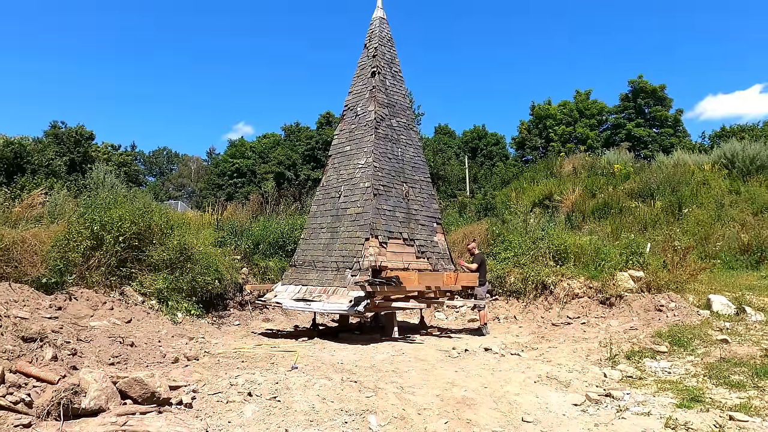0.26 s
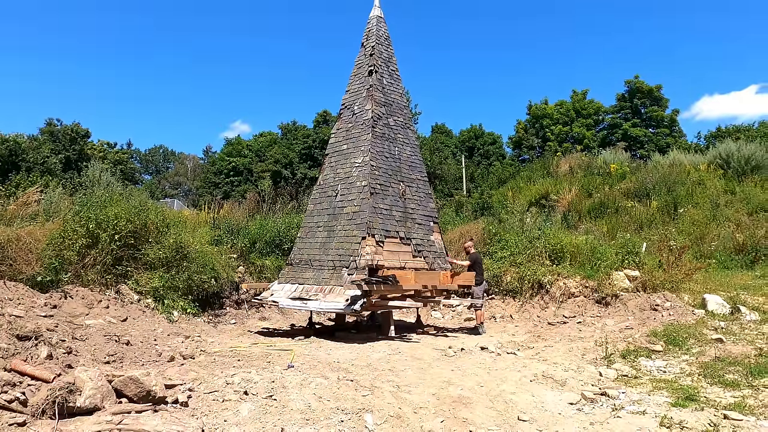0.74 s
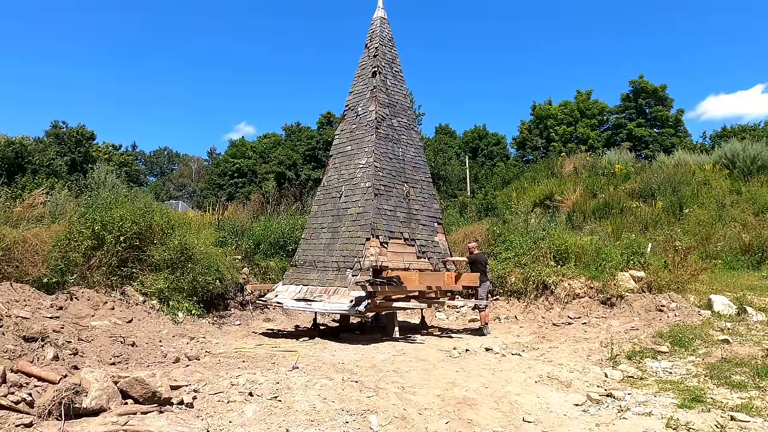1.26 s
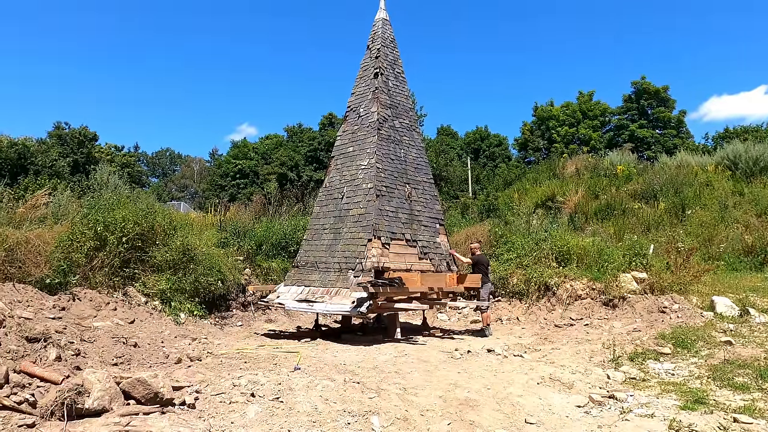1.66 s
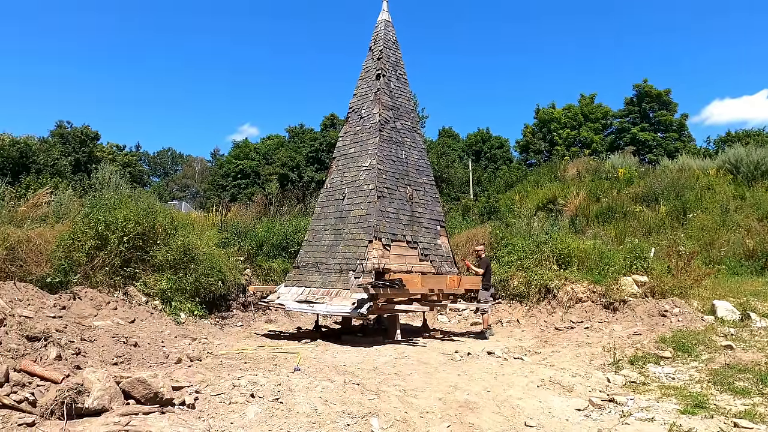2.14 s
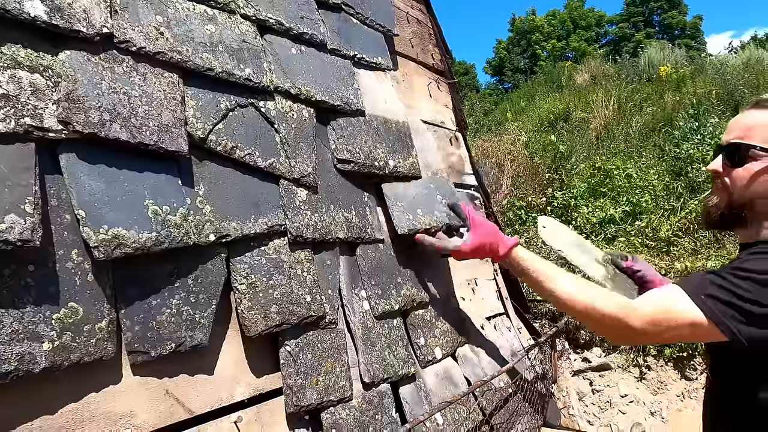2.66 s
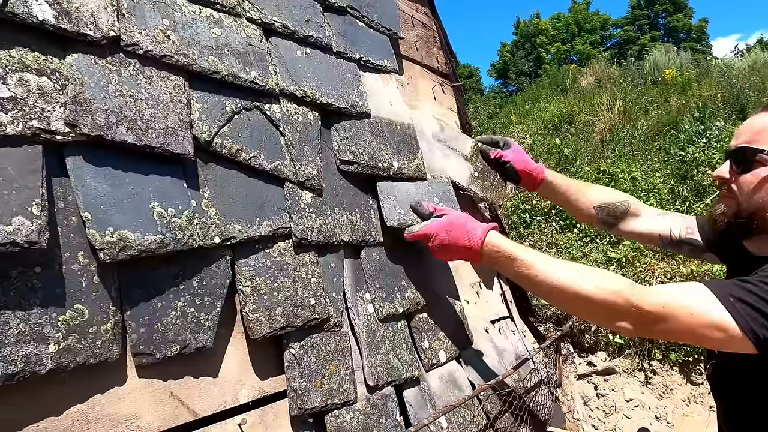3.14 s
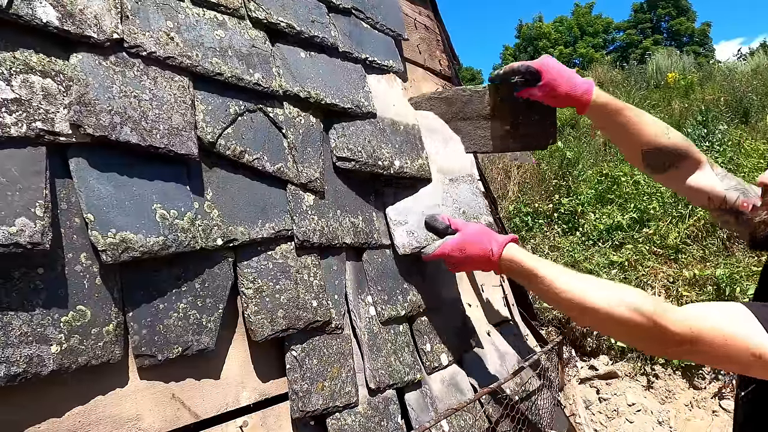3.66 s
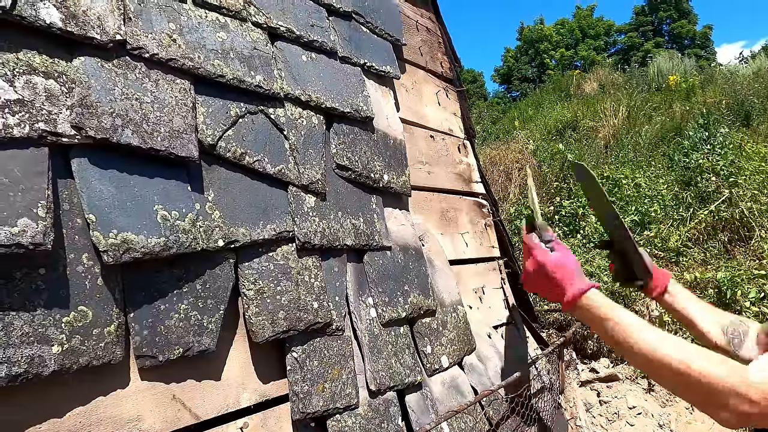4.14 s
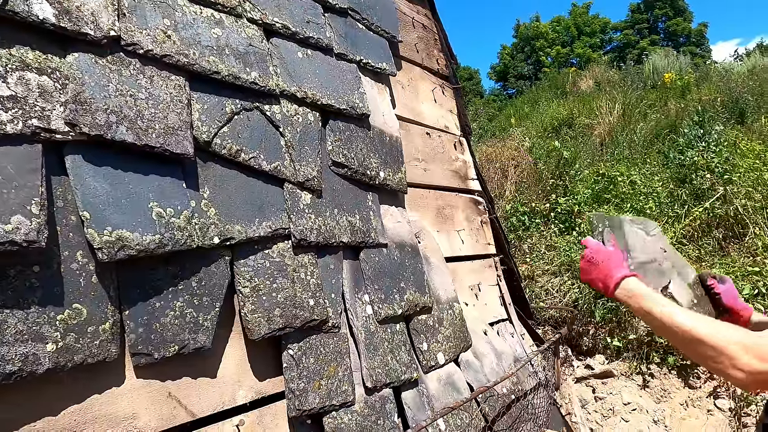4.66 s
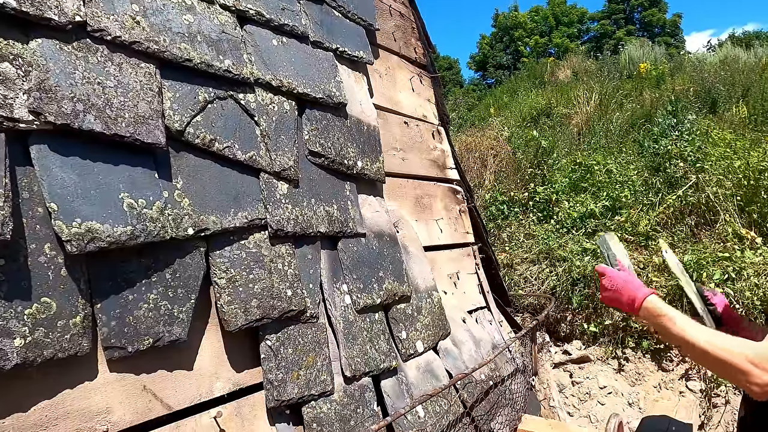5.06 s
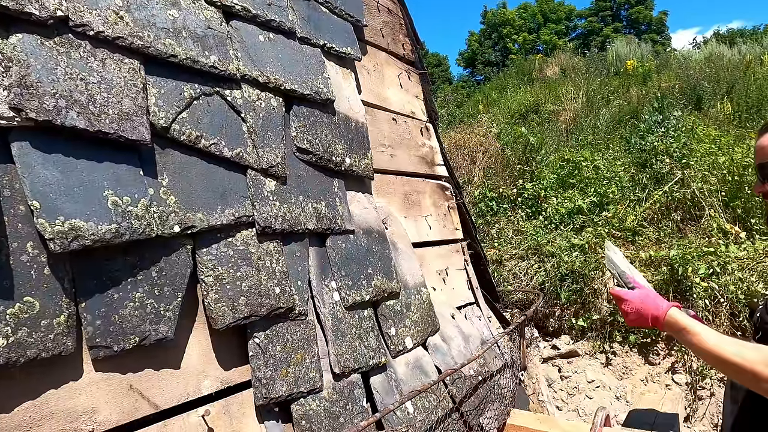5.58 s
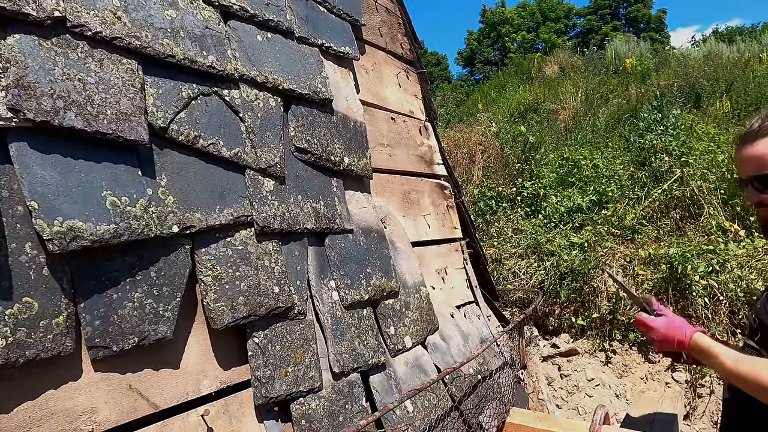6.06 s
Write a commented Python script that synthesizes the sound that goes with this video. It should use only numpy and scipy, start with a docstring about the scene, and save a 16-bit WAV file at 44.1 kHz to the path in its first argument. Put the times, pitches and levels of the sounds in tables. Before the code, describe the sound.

Outdoors, old roof slates clink faintly in the distance, then close up they scrape gritty off wooden boards, clatter and ring in the hands.

```python
"""Old slates are worked loose from a boarded spire outdoors: first heard from afar in mono, then, after a cut, close by
in stereo. Grit scrapes and edges knock, driving resonant modes: the slates ring dully on the boards and clearly once
held free in gloved hands. Shaped noise makes wind rumble on the microphone over a faint rustle of bushes.
A short scatter follows the slates; the microphone dulls the treble."""
import sys
import numpy as np
from scipy import signal
from scipy.fft import rfft, irfft, next_fast_len
from scipy.io import wavfile

SR = 44100
rng = np.random.default_rng(int(sys.argv[2]) if len(sys.argv) > 2 else 0)


def inscribe(sig):
    """Save sig as 16-bit PCM at rate SR to the path in sys.argv[1].

    A 1-D sig is mono; a 2-D sig holds one channel per row.
    Samples are clipped to [-1, 1] before scaling.
    """
    pcm = np.round(np.clip(np.atleast_2d(sig).T, -1, 1) * 32767)
    wavfile.write(sys.argv[1], SR, pcm.astype(np.int16))


N = 278712
CUT_S = 2.418  # the far view ends and the close view begins
IS_FAR = np.arange(N) < CUT_S * SR


def amp(db):
    """Decibel law: the amplitude gain of a level in dB."""
    return 10 ** (np.asarray(db) / 20)


def unit(x):
    """Normalisation: x at rms 1."""
    return x / np.sqrt(np.mean(x ** 2) + 1e-20)


def along(points, hz):
    """Logarithmic frequency scale: interpolates (f/Hz, value) points on a log axis."""
    f, v = np.transpose(points)
    return np.interp(np.log(hz + 1), np.log(f + 1), v)


def curves(tables):
    """Linear interpolation: one value per sample for each column after the time."""
    s, *cols = np.vstack(tables).T
    return np.array([np.interp(np.arange(N) / SR, s, c) for c in cols])


def wobble(rate, size=N):
    """Slow random modulation: straight lines between normal random knots, rate of them a second."""
    knots = int(size * rate / SR) + 2
    return np.interp(np.arange(size) * rate / SR, np.arange(knots), rng.standard_normal(knots))


def filtered(x, response):
    """Linear filtering: the spectrum of x times a response of frequency."""
    m = next_fast_len(N + 8192)
    spectrum = rfft(x, m) * response(np.fft.rfftfreq(m, 1 / SR))
    return irfft(spectrum, m)[..., :N]


def rush(spectrum, side_db):
    """Mid-side synthesis: noise of rms 1 in all; the two ports differ only in the close view."""
    mid, side = filtered(rng.standard_normal((2, N)), lambda hz: amp(along(spectrum, hz)))
    side = side * amp(side_db) * (np.arange(N) > CUT_S * SR)
    return unit(np.array([mid + side, mid - side]))


# Course of the rustle, before its random drift: t/s, level/dB
RUSTLE_COURSE = [(0, -49.5), (.1, -64), (.5, -60.5), (1.9, -62), (2.41, -64.5), (2.43, -60.5), (4.3, -65),
                 (5.1, -62.5), (6.32, -67)]
# Spectral density of the rustle: f/Hz, level/dB (per Hz, relative)
RUSTLE_SPECTRUM = [(200, -2.5), (400, -8.5), (800, -8.5), (1400, -4), (2200, -13), (4000, -23.5),
                   (7000, -21.5), (9000, -44.5), (16000, -82.5)]


def bushes():
    """Broadband noise: many small leaf contacts merge into a smooth hiss that drifts in level."""
    level_db = curves([RUSTLE_COURSE])[0] + 1.6 * wobble(4.2)
    return amp(level_db) * rush(RUSTLE_SPECTRUM, side_db=-1.5)


# Course of the wind in each view, before gusts: t/s, deep buffet level/dB, rumble level/dB
WIND_COURSE = [
    [(0.0, -46, -43.5), (0.33, -52, -43), (0.72, -44, -46.5), (0.92, -55, -45.5), (1.44, -43, -45.5),
     (1.9, -48.5, -41.5), (2.11, -44.5, -40), (2.41, -44, -40.5)],
    [(2.43, -49.5, -47), (3.26, -49, -51.5), (3.61, -48, -42), (4.4, -52.5, -56.5), (4.67, -52, -53),
     (5.08, -63.5, -54.5), (5.7, -50.5, -49.5), (6.32, -48, -52.5)],
]
# Spectral densities of the deep buffet and of the rumble in each view: f/Hz, level/dB (per Hz, relative)
BUFFET_SPECTRUM = [(12, -22.5), (25, 12.5), (45, 17.5), (75, -2.5), (110, -50)]
FAR_RUMBLE_SPECTRUM = [(35, -45), (60, -0.5), (150, -5), (235, -10.5), (295, -18.5), (355, -31),
                       (464, -27.5), (700, -44), (910, -58), (1540, -120)]
NEAR_RUMBLE_SPECTRUM = [(35, -20.5), (60, 1.5), (120, -0.5), (180, -4), (250, -20.5), (350, -27),
                        (550, -47), (900, -97.5)]


def wind():
    """Turbulent pressure: gusts thump and rumble in lumps on the microphone."""
    deep_db, rumble_db = curves(WIND_COURSE)
    gust = wobble(8.9)
    deep = amp(deep_db + 5.7 * gust + 2.0 * wobble(5.0)) * rush(BUFFET_SPECTRUM, side_db=-8.0)
    far = rush(FAR_RUMBLE_SPECTRUM, side_db=-99)
    near = rush(NEAR_RUMBLE_SPECTRUM, side_db=-21.5)
    rumble = amp(rumble_db + 0.45 * gust + 3.25 * wobble(21)) * np.where(IS_FAR, far, near)
    return deep + rumble


def echoes(x, level_db, t60, bright):
    """Diffuse scattering: a short decaying random tail, different in each port and tilted toward the treble."""
    t = np.arange(SR // 4) / SR
    tail = rng.standard_normal((2, len(t))) * amp(-60 * t / t60) * (t > .001)
    tail = signal.lfilter([1, -bright], 1, tail)  # the treble tilt
    tail /= np.linalg.norm(tail[0])
    return x + amp(level_db) * signal.fftconvolve(x, tail, axes=1)[:, :N]


def toward_right(x, lag_s, shade_db):
    """Port delay and shading: sound from the right reaches the left port late and duller."""
    side = np.array([[-.5], [.5]])

    def response(hz):
        turn = 2 * np.pi * hz * lag_s / np.sqrt(1 + (hz / 6000) ** 2)  # phase levels off in the treble
        shade = amp(shade_db * side * np.minimum(hz / 9000, 1.5))
        return np.exp(1j * turn * side) * shade

    return filtered(x, response)


PART_EDGES_HZ = [700, 2500, 6200]  # between the low, body, bright and top parts
FIRM_DB = -30  # body level of a firm contact
FAINT_HISS = .4  # dB of top part for each dB that a contact is weaker
RUB_TOP_FOLLOWS, HIT_TOP_FOLLOWS = .6, 1.3  # dB of top part for each dB of bright part


def parts(body_db, low_db, bright_db, top_db, follows):
    """Spectral balance: levels of the four parts; the top follows the bright part, weak contacts hiss more."""
    top = top_db + follows * bright_db - FAINT_HISS * (body_db - FIRM_DB)
    return body_db + np.array([low_db, 0, bright_db, top])


def grit(spiky_db, clump_db):
    """Granular friction: sand catches between two faces as clumped uneven noise; coarse grains crack at times."""
    spikes_db = spiky_db * np.minimum(rng.exponential(size=N), 5)
    sizes = amp(spikes_db + clump_db * (wobble(45) + wobble(160)))
    coarse = signal.lfilter([1], [1, -.97], rng.random(N) < 90 / SR)  # about 90 a second, each dying away
    return unit(sizes * (1 + 0.88 * coarse) * rng.standard_normal(N))


RAMP_DB = 20  # a stroke climbs this much in its rise and loses it in its fall
# Scraping strokes: full strength from t/s, rise t/s, hold t/s, fall t/s,
# body level/dB, low part level/dB (from body), bright part level/dB (from body)
SCRAPING_STROKES = [ (0.652, 0.02, 0.0011, 0.047, -36, -7, -1.5),
                    (0.741, 0.07, .001, 0.096, -36.5, -9.5, -3), (.83, .045, .001, 0.1, -41, -6.5, -6.5),
                    (0.933, .03, .001, .3, -52, -27, -19), (1.121, .008, .001, .11, -46, -6.5, -29),
                    (1.194, 0.029, .001, 0.026, -39, -16, -20), (1.26, 0.17, .001, 0.13, -47.5, -20, -7.5),
                    (1.416, 0.037, 0.0011, 0.074, -36.5, -29, -12),
                    (1.47, 0.047, 0.076, 0.1, -38.5, -16.5, 1), (1.668, 0.11, .001, 0.4, -63, -18, -7),
                    (2.419, .002, .001, 0.12, -28, -6.5, -15),
                    (2.482, 0.0083, .001, 0.045, -22.5, -2.5, -15), (2.54, .05, 0.051, .02, -36, -2.5, -8),
                    (2.597, 0.0049, 0.00088, .034, -14, -7.5, -4.5),
                    (2.657, 0.07, 0.048, 0.091, -25.5, -4, -0.5),
                    (2.762, 0.17, 0.041, 0.054, -20, -10, -5.5), (2.827, 0.07, 0.024, 0.029, -27, -2, -24),
                    (2.901, .006, 0.055, .05, -33.5, -1.5, -4),
                    (2.96, 0.089, 0.016, 0.042, -28.5, -5.5, -4.5),
                    (3.022, .015, .001, 0.071, -31, -4, -14.5),
                    (3.093, 0.0046, 0.0091, 0.082, -19, -0.5, -5.5),
                    (3.244, 0.0077, 0.023, 0.048, -22.5, 0.5, -6.5), (3.295, 0.036, .001, 0.27, -49, 11, 0),
                    (3.46, 0.0063, .001, 0.084, -16.5, -6.5, -29),
                    (3.509, 0.035, .001, 0.13, -15, -13.5, -13), (3.595, 0.077, .001, 0.064, -23.5, -3, -6),
                    (3.645, 0.057, 0.047, .03, -27, -8, -7), (3.691, 0.016, .2, 0.024, -21, -14.5, -5),
                    (3.931, 0.06, .001, 0.052, -21.5, -10, -8), (3.995, .016, .001, 0.046, -19, -8, -23),
                    (4.065, .05, .001, 0.14, -50.5, -1.5, -7), (4.152, 0.035, .05, 0.17, -57, -25, 7),
                    (4.318, 0.051, .06, 0.13, -47, -22, -1.5), (4.455, .1, 0.39, 0.044, -63.5, -26, -1),
                    (4.786, 0.11, .001, 0.035, -44, -11.5, -9),
                    (4.804, 0.0293, 0.063, 0.066, -52.5, -18.5, -8),
                    (4.905, 0.097, 0.091, 0.12, -62, 5, -1.5), (4.97, .05, .03, .04, -65, -8, 1),
                    (5.19, 0.06, .001, 0.091, -42.5, -7, 2), (5.242, 0.014, .001, 0.071, -31, -17, -1.5),
                    (5.374, 0.039, 0.046, 0.059, -32.5, -28, 0.8),
                    (5.42, 0.035, 0.051, 0.036, -26.5, -29, -2.5),
                    (5.56, 0.045, 0.023, 0.064, -40.5, -28, -1),
                    (5.596, 0.029, 0.038, 0.07, -28.5, -31.5, 2),
                    (5.676, 0.11, 0.00085, 0.033, -33, -26.5, 8), (5.693, .02, .001, 0.042, -54, -15, 9),
                    (5.765, .05, 0.1, 0.059, -63.5, -28, -2), (5.893, 0.16, 0.039, 0.082, -57, -30, 0),
                    (5.99, 0.021, 0.047, 0.11, -38.5, -6, -3.5),
                    (6.055, 0.036, 0.041, 0.11, -38, -14, -7.5),
                    (6.254, 0.067, 0.056, .05, -47, -14.5, 3.2), ]


def strokes(begin, end, t, top_db):
    """Energy addition: strokes rise, hold and fall, adding in power; one gain curve for each part."""
    power = np.zeros((4, len(t)))
    for s, rise, hold, fall, *levels in SCRAPING_STROKES:
        if begin <= s < end:
            away = np.maximum(s - t, 0) / rise + np.maximum(t - s - hold, 0) / fall
            part_gains = amp(parts(*levels, top_db, RUB_TOP_FOLLOWS))
            power += np.outer(part_gains, amp(-RAMP_DB * away)) ** 2
    return np.sqrt(power)


def knock(t60, loose):
    """Impulse excitation: one blow, and the loose edge clattering after it as decaying noise."""
    t = np.arange(SR // 10) / SR
    strength = np.sqrt(t60 * SR / np.log(10 ** 6))  # norm of an exponential decay with this t60
    clatter = amp(-60 * t / t60) * rng.standard_normal(len(t))
    clatter *= loose * strength / np.linalg.norm(clatter)
    clatter[:3] += strength * np.array([1, 2, 1]) / 4  # the contact lasts a moment
    return clatter


# Knocks: t/s, body level/dB, low part level/dB (from body), bright part level/dB (from body), favoured f/Hz
EDGE_KNOCKS = [ (.645, -40.5, -22, -4, 1430), (.724, -38.5, -20, -1.5, 3620), (.758, -43, 7, -14, 3430),
               (.819, -38, -22, 6, 3210), (.836, -38.5, -18, -2, 2020), (.923, -53, -22, -11, 1990),
               (1.008, -51, -22, -5, 2140), (1.056, -50, -19, -23, 1530), (1.115, -47.5, -19, -29, 975),
               (1.19, -57, -13, -21, 2280), (1.271, -42, -9, -5, 3720), (1.413, -38.5, -24, -10, 2430),
               (1.471, -29, -38, 3, 1780), (1.515, -39, -24, -3.5, 3270), (1.574, -48.5, -20, 10, 3340),
               (2.419, -31.5, -39, -25, 2080), (2.444, -30, -11.5, -19.5, 1450),
               (2.474, -24.5, -30, -22, 1750), (2.527, -66, -10, 17, 6100), (2.595, -19, -29, -20, 1040),
               (2.605, -17.5, -28, -7.5, 1340), (2.679, -21.5, -13, -1.5, 1300),
               (2.717, -24.5, -16, -18.5, 1720), (2.742, -24, -28, -18, 1330),
               (2.774, -22.5, -26, -24, 1290), (2.9, -35, -8, -7.5, 1260), (3.014, -38, -24, -25, 1520),
               (3.091, -22, 3, -13, 946), (3.144, -32, -6, -1.5, 1530), (3.238, -23.5, -0.5, 4.7, 4660),
               (3.256, -19, -25, -20, 1270), (3.39, -65, -13, 10, 3300), (3.44, -56.5, -10, 7.5, 3320),
               (3.455, -20.5, -4.5, -16, 1000), (3.496, -20, -27, -30, 1310), (3.515, -17, -19, -21, 1385),
               (3.595, -25, -16, -17, 1680), (3.685, -18.5, -13, -3, 1320), (3.696, -17.5, -35, -22, 1320),
               (3.776, -23, -10, 7, 2200), (3.819, -17, -24, 0, 2510), (3.848, -24.5, -27, 5.5, 2510),
               (3.876, -24.5, -27, -10, 1630), (3.908, -20.5, -19, 2, 2930), (3.926, -23.5, -18, 3, 4010),
               (3.99, -21.5, -3.5, -6.5, 3040), (4.065, -48.5, 7.5, 2.8, 3350),
               (4.329, -7.5, -27.5, -1, 2930), (4.402, -51.5, -34, 6, 4070), (4.688, -32.5, -9, -10, 2270),
               (4.699, -5.5, -37, -9.5, 2180), (4.768, -23.5, -26, -2, 1280), (5.03, -48, -23, 0.5, 4400),
               (5.183, -23, -14.5, 6.5, 1416), (5.187, -28.5, -31, 4, 1390), (5.223, -41, -27, 1, 4000),
               (5.239, -20.5, -33, 6.5, 1380), (5.297, -23.5, -44.5, -22, 2990),
               (5.418, -18, -35, -15, 2350), (5.434, -15.5, -42, -8, 900), (5.464, -23, -41, -14, 894),
               (5.601, -29, -26, -7, 2980), (5.632, -26, -24, -10, 1380), (5.672, -24, -37, -12, 1410),
               (5.969, -47, -20, 10, 3000), (5.979, -20, -20, 13.5, 5350), (6.009, -33, -12, 3, 1660),
               (6.067, -34.5, -23, -18, 1750), (6.076, -28, -15, -23, 1690), (6.246, -35, -19, 4, 3000),
               (6.311, -18.5, -49, 3.5, 1920), ]


def knocks(begin, end, clatter_t60, loose, mode_count):
    """Point-dependent excitation: each knock's row, its blow and a random contact spot for every mode."""
    rows = [row for row in EDGE_KNOCKS if begin <= row[0] < end]
    return [(row, knock(clatter_t60, loose), rng.standard_normal(mode_count)) for row in rows]


WANDER_DB, SCATTER_DB = 6, 2  # drift of a sharp mode's share along a stroke; scatter of any between knocks
BROAD_HZ, BROAD_WANDER_DB = 400, 2  # modes wider than this, and the low ones, drift little
# Bounds of the turns in which each set of slates is handled: t/s
HANDLING_TURNS = [0, 1.375, 2.418, 3.452, 4.3, 5.175, 6.32]


def slates(modes, order, grains, rub_top_db, hit_top_db, clatter_t60, loose, favour_db, spread_db):
    """Modal superposition: grit and knocks drive each mode; the contact decides how much each one takes."""
    hz, width, db = np.transpose(modes)
    part = np.digitize(hz, PART_EDGES_HZ)
    power = amp(db) ** 2 * width
    share = np.sqrt(power / np.bincount(part, power)[part])  # powers in each part add to one
    begin, end = HANDLING_TURNS[order:order + 2]
    start = round(begin * SR)
    stop = min(round(end * SR) + SR // 4, N)  # room to ring on
    stroke = strokes(begin, end, np.arange(start, stop) / SR, rub_top_db)
    hits = knocks(begin, end, clatter_t60, loose, len(modes))
    out = np.zeros((2, N))
    for k in range(len(modes)):
        push = np.zeros(N + SR // 10)
        wander_db = WANDER_DB if width[k] < BROAD_HZ and part[k] else BROAD_WANDER_DB
        drift = amp(wander_db * wobble(18.06, size=stop - start))
        push[start:stop] = stroke[part[k]] * drift * grains[start:stop]
        for (s, *levels, favoured_hz), blow, spot in hits:
            level_db = parts(*levels, hit_top_db, HIT_TOP_FOLLOWS)[part[k]] + SCATTER_DB * spot[k]
            octaves = np.log2(hz[k] / favoured_hz)
            level_db += favour_db * np.exp(-(octaves / 0.1) ** 2)  # modes near the favoured pitch take more
            push[round(s * SR):][:len(blow)] += amp(level_db) * blow
        resonator = signal.iirpeak(hz[k], max(hz[k] / width[k], .6), SR)
        ring = signal.lfilter(*resonator, push[start:stop])
        # neighbouring modes swing against each other
        ring *= (-1) ** k * share[k] * np.sqrt(SR / (np.pi * width[k]))
        edges = [.5 * hz[k], min(2 * hz[k], .45 * SR)]  # a mode gives the air little far from its own pitch
        ring = signal.lfilter(*signal.butter(2, edges, "band", fs=SR), ring)
        # each sharp mode radiates its own way
        lean_db = spread_db * np.tanh(rng.normal()) * (width[k] < BROAD_HZ)
        out[:, start:stop] += ring * amp(lean_db * np.array([[.5], [-.5]]))
    return out


# Modes of the first far slates: f/Hz, width f/Hz, level/dB (density, relative within each part)
FIRST_FAR_MODES = [(300, 72, -4.0), (530, 66, -13.5), (1695, 3400, -4.5), (3980, 3300, -17),
                   (8060, 3800, -58.5), (976, 89, -2), (1468, 37, 5.0), (2000, 63, 5.0), (2246, 71, 0.5),
                   (2720, 104, -0.5), (2927, 68, -0.5), (3430, 62, -2), (3660, 73, -3.5), (4140, 46, -9),
                   (5050, 49, -6), (5340, 28, -36), (6040, 50, -11.5), (6500, 39, -26), (6670, 77, -32),
                   (6640, 33, -27), (8120, 37, -16)]


def first_far_slates():
    """Damped resonance: broad modes ring dully from afar, with no spread between the ports."""
    return slates(FIRST_FAR_MODES, order=0, grains=grit(1.8, 3.0), rub_top_db=-28.5, hit_top_db=-42,
                  clatter_t60=0.031, loose=0.96, favour_db=18.5, spread_db=0)


# Modes of the second far slates: f/Hz, width f/Hz, level/dB (density, relative within each part)
SECOND_FAR_MODES = [(503, 260, -24), (1510, 3600, -17), (4200, 6500, -20.0), (8040, 5000, -43.5),
                    (691, 21, -12), (1000, 30, -19), (1774, 10.5, 2), (2350, 51, -16), (2890, 92, -10),
                    (3263, 50, 3.5), (3540, 29, -9), (4080, 28, -18), (4250, 18, -2), (5160, 27, -7),
                    (5710, 32, -25), (5880, 14, -1.5), (6450, 78, -23), (6940, 100, -25.5),
                    (7270, 66, -15.5), (7700, 76, -29.5), (8800, 44, -24.0), (9100, 88, -29)]


def second_far_slates():
    """Resonance over a broad bed: sharper modes under spikier grit, with no spread between the ports."""
    return slates(SECOND_FAR_MODES, order=1, grains=grit(7.3, 1.2), rub_top_db=-22, hit_top_db=-31,
                  clatter_t60=0.024, loose=1.37, favour_db=7.5, spread_db=0)


# Modes of slates on the boards: f/Hz, width f/Hz, level/dB (density, relative within each part)
ROOF_MODES = [(139, 44, 1.5), (209, 33, 5.5), (287.5, 95, 8.5), (338, 220, 2.5), (536, 630, 0.5),
              (1640, 5300, -3), (3560, 3900, -16), (9000, 6000, -44.0), (897, 270, 3), (1304, 17, 0.5),
              (1761, 48, 8.5), (2214, 320, -3), (3430, 14, -7.0), (3660, 58, -5.5), (3850, 17, -21.5),
              (4070, 410, -9), (4420, 39, -21), (4790, 71, -11.0), (5500, 59, -26.0), (6050, 38, -17),
              (5930, 72, -37.5), (6740, 71, -39.5), (7320, 51, -34), (7540, 58, -26.0), (8300, 100, -39.5),
              (8550, 35, -34.0), (9000, 98, -37.0)]


def roof_slates():
    """Boundary damping: slates lying on the boards ring dully, with strong low modes."""
    return slates(ROOF_MODES, order=2, grains=grit(2.6, 1.45), rub_top_db=-20, hit_top_db=-17.5,
                  clatter_t60=0.044, loose=1.6, favour_db=13.5, spread_db=2.5)


# Modes of a slate dragged off: f/Hz, width f/Hz, level/dB (density, relative within each part)
PULLED_MODES = [(209.0, 68, 4.0), (307, 87, -7.5), (476, 450, -4), (827, 160, -4.5), (1640, 3400, -1.0),
                (3560, 4900, -14.0), (8850, 5500, -35), (926, 370, -13.0), (1350, 120, -9), (1746, 19, 8),
                (2164, 130, -4.5), (2490, 9.8, 0.5), (2890, 19, 0.5), (3370, 60, -5.0), (3750, 37, 3.5),
                (3940, 19, -4.5), (4490, 35, -15.5), (5030, 27, -5.5), (5900, 35, -27.5), (5900, 57, -7.5),
                (6600, 280, -35), (7040, 26, -22.5), (7400, 52, -21.0), (7600, 45, -32.5),
                (8200, 47, -22.0), (8520, 26, -28.5), (8960, 53, -39.5)]


def pulled_slate():
    """Friction drive: a slate dragged off the boards scrapes, and its loose edge clatters."""
    return slates(PULLED_MODES, order=3, grains=grit(3.5, 0.65), rub_top_db=-15.5, hit_top_db=-31,
                  clatter_t60=0.029, loose=1.83, favour_db=10, spread_db=1)


# Modes of slates held apart: f/Hz, width f/Hz, level/dB (density, relative within each part)
HELD_MODES = [(300, 88, -20), (456, 5.6, -5), (837, 22, -9), (943, 24, -28), (1054, 11, -13.5),
              (1314, 16.6, 3), (1435, 19, -4), (1747, 19, -9.5), (1895, 32, -2.5), (2257, 230, -4.5),
              (2344, 43, 0.5), (2563, 54, -14), (2740, 20, -7), (2980, 16, -1), (3470, 58, -8.5),
              (3670, 38, -14), (3970, 36, -7.5), (4400, 50, -7.5), (4550, 45, -15), (5360, 49, -9.5),
              (5730, 70, -8.5), (6160, 25, -16), (6630, 35, -40), (7100, 30, -30.5), (7660, 28, -38.5),
              (2000, 1100, -22.5), (4260, 7000, -25.5), (8950, 3400, -61.5)]


def held_slates():
    """Free-plate resonance: two slates held apart ring clearly in narrow modes."""
    return slates(HELD_MODES, order=4, grains=grit(3.6, 3.0), rub_top_db=-26, hit_top_db=-7,
                  clatter_t60=0.0081, loose=0.91, favour_db=8.0, spread_db=7.0)


# Modes of slates pressed together: f/Hz, width f/Hz, level/dB (density, relative within each part)
PAIR_MODES = [(454, 31, 8), (570, 120, -29), (1765, 1600, -12.0), (4370, 9100, -23.0), (8820, 5400, -43.5),
              (898.0, 24.4, -5), (1418, 42, -2.0), (1753, 24, -2), (2340, 23.4, -1.5), (2760, 36, -4),
              (2972, 25, 1.5), (3400, 65, -11.0), (3960, 53, -5.5), (4230, 24, -9.0), (4610, 117, -7.0),
              (5340, 43, -10.5), (5860, 98, -10.5), (5970, 43, -13.5), (6340, 31, -28.5), (6700, 51, -39),
              (7300, 42, -29), (6740, 60, -15), (8000, 150, -28), (8400, 72, -39), (9000, 78, -40)]


def pressed_pair():
    """Contact damping: the two slates pressed together ring in mostly broader modes."""
    return slates(PAIR_MODES, order=5, grains=grit(2.2, 3.1), rub_top_db=-20.5, hit_top_db=-17,
                  clatter_t60=.015, loose=0.98, favour_db=9.0, spread_db=8)


def scene():
    """Superposition: the wide view in mono, then the close view in stereo, with wind and bushes throughout."""
    far = first_far_slates() + second_far_slates()
    wide = echoes(far, level_db=-8, t60=0.12, bright=0.18)[0] * IS_FAR
    on_roof = roof_slates() + pulled_slate()
    in_hands = held_slates() + pressed_pair()
    near = toward_right(on_roof, lag_s=.000045, shade_db=1.5)
    near += toward_right(in_hands, lag_s=.000045, shade_db=6.5)
    close = echoes(near, level_db=-7, t60=0.053, bright=0.88)
    return wide + close + wind() + bushes()


PEAK = .9  # amplitude that the rounding approaches
TOP_HZ = 15800  # band limit
# Frequency response of the microphone: f/Hz, level/dB (gain)
MIC_RESPONSE = [(100, 2), (4500, -2.5), (6500, -8.5), (9000, -9.5), (12000, -15.5), (14000, -29.5),
                (16000, -31)]


def record(dry):
    """Transducer response: treble is dulled, the loudest peaks are rounded off, then the band is limited."""
    x = filtered(dry, lambda hz: amp(along(MIC_RESPONSE, hz)))
    x = x / (1 + np.abs(x / PEAK) ** 4) ** (1 / 4)
    return filtered(x, lambda hz: hz < TOP_HZ)


dry = scene()
out = record(dry)
inscribe(out)
```